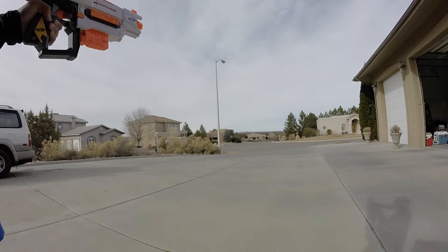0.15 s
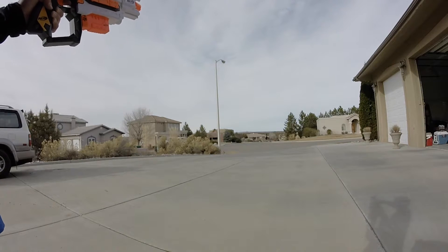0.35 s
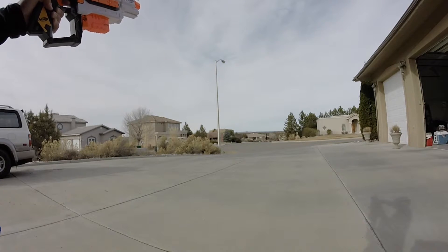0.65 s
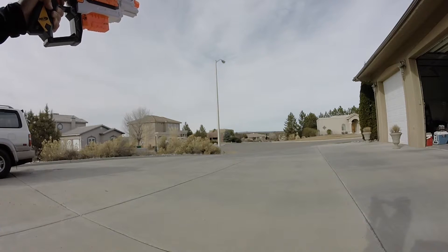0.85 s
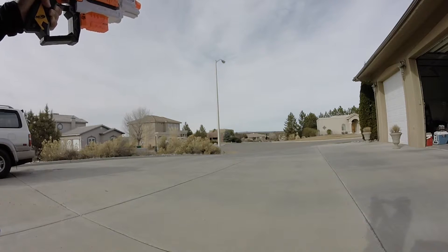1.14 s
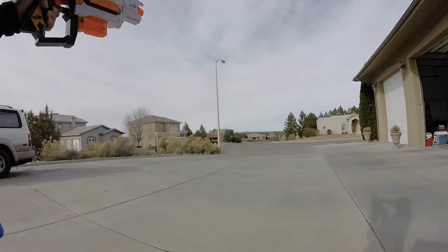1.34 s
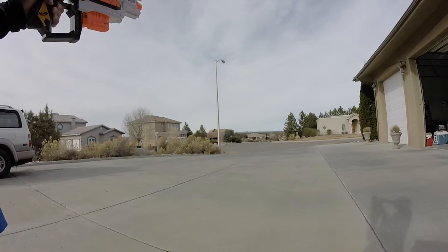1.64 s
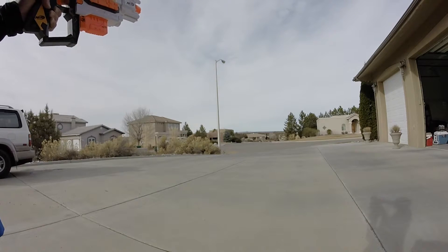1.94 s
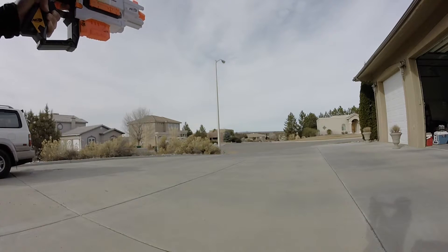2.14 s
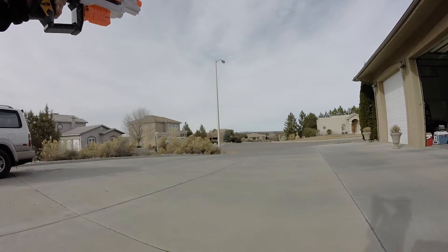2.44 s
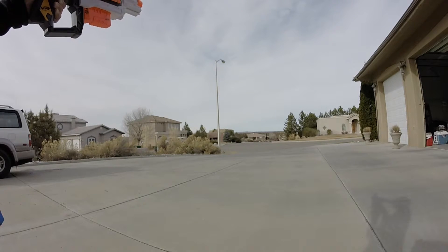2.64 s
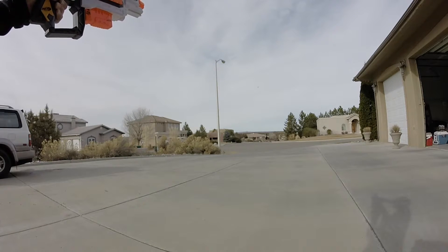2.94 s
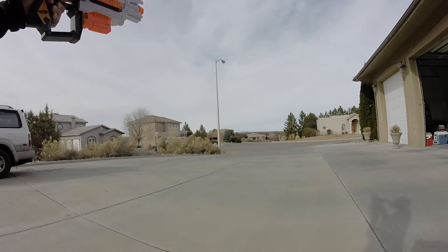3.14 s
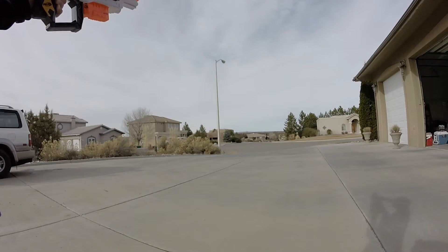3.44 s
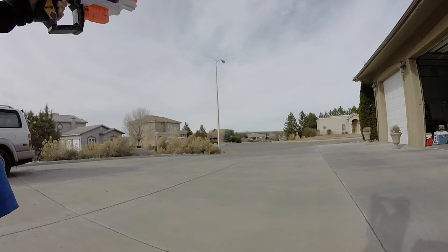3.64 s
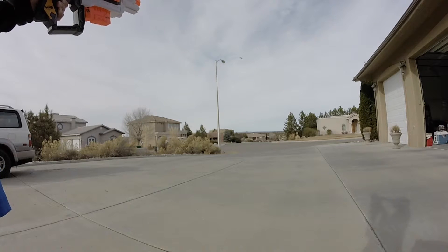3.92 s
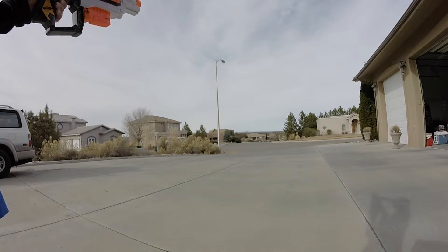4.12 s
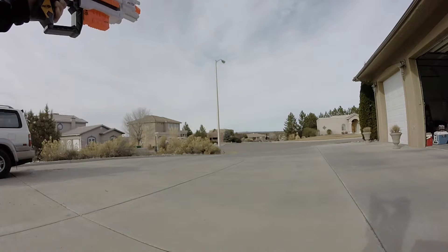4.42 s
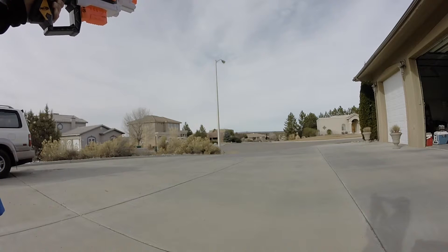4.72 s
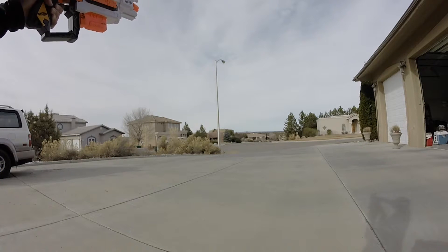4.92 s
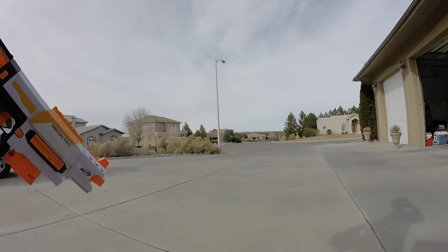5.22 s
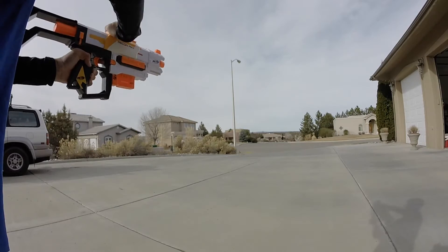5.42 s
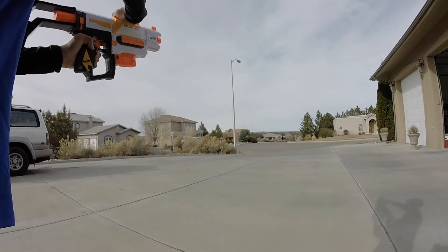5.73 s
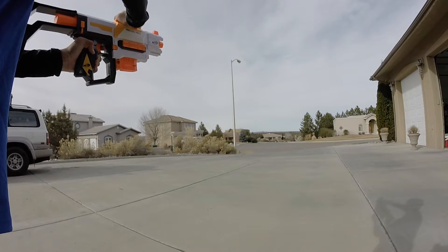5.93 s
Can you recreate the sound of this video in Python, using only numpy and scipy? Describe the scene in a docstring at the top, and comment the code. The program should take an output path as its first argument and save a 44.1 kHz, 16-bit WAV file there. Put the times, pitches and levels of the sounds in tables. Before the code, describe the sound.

Close to the microphone on an open concrete driveway, a plastic toy blaster is cocked with a quick ratcheting rasp and loud latch, then pushed home with a double knock. Each of four shots snaps and pops sharply with a short springy buzz. Small handling ticks fill the gaps, faint reflections come off the garage and houses, and a final push clacks at the end over faint wind.

```python
"""A concrete driveway by a garage, far houses beyond: a spring-powered plastic dart blaster fires four times.
Before each shot the slide rasps back and latches, then is pushed home with a double knock; it is pushed
once more before the first shot and after the last. Each shot is a catch snapping, a plunger slam, a pop of
air, a kick and a buzzing spring. Contacts are noise bursts plus dying sines for shell and hollow.
Ground, garage and houses answer; a far hush, a low drone, light wind and soft bumps lie beneath."""
import sys
import numpy as np
from scipy import signal
from scipy.fft import rfft, irfft
from scipy.io import wavfile

SR = 44100
rng = np.random.default_rng(int(sys.argv[2]) if len(sys.argv) > 2 else 0)


def unload_audio(sound):
    """Save the sound as a 16-bit wav file, at the path given as the first command line argument."""
    columns = np.transpose(np.atleast_2d(sound))
    # keep every value between -1 and 1, then stretch to whole-number steps
    steps = np.round(np.clip(columns, -1, 1) * 32767)
    wavfile.write(sys.argv[1], SR, steps.astype(np.int16))


N = 267687
TIME = np.arange(N) / SR  # scene clock [s]
AGE = TIME[:SR // 4]  # time since a single sound began [s]

# All event levels are mix settings; the sound's own function trims them further.
# distant outdoor hush: (frequency [Hz], relative density [dB per Hz])
HUSH_COLOUR = [(41, -31.5), (70, -4), (129, -10.5), (218, -8), (431, -13), (517, -15), (892, -16.5),
               (1650, -22.5), (2120, -24), (4090, -30.5), (4910, -33.5), (13300, -48), (14600, -49.5),
               (16000, -74)]
# a faint low drone: (time [s], level [dB])
DRONE_LEVEL = [(0, -66.5), (1.6, -61.5), (3.1, -54), (3.8, -56.5), (4.3, -73), (6.07, -64.5)]
# gusts over a light steady breeze: (middle [s], half length [s], level [dB])
GUSTS = [(.4, .1, -56), (1.36, 0.21, -52), (4.96, 0.2, -49.5)]
# soft bumps on the microphone mount: (time [s], level [dB])
MOUNT_BUMPS = [(0.444, -30.5), (1.194, -31.5), (4.971, -34), (5.136, -25)]
# the slide is pulled back against the spring until it latches:
# (start [s], latch [s], rasp [dB], latch crack [dB], latch knock [dB], hollow pitch [Hz])
PULLS = [(.081, 0.153, -17.5, -5.5, -9, 718), (2.171, 2.2427, -16.5, -3, -25, 426),
         (3.241, 3.3047, -15, -4, -21, 426), (4.297, 4.3602, -15.5, -3, -20, 433)]
# the slide is pushed home, seats and locks:
# (start [s], seat [s], rub [dB], crack [dB], knock [dB], seat pitch [Hz], lock pitch [Hz])
PUSHES = [(0.256, 0.3044, -22.5, -25, -16.5, 439, 437), (1.33, 1.35, -22, -17, -14.5, 590, 407),
          (2.354, 2.415, -18.5, -9, -12, 730, 396), (3.412, 3.466, -20, -8.5, -16.5, 597, 358),
          (4.469, 4.525, -21, -5, -13.5, 596, 479), (5.452, 5.532, -22, -7, -13, 404, 340)]
# the slide snags on its way: (time [s], crack [dB], knock [dB], hollow pitch [Hz])
SNAGS = [(.114, -9, -18.5, 717), (.265, -21.5, -21.5, 695), (1.3266, -19.5, -30, 436),
         (1.339, -18.5, -18, 366), (2.196, -19, -22.5, 467), (2.222, -9, -31, 641),
         (2.368, -20.5, -18.5, 481), (2.401, -15, -27, 449), (3.262, -18, -20.5, 510),
         (4.323, -19, -18.5, 428), (4.485, -25, -18.5, 737), (5.462, -29, -43, 594),
         (5.478, -32, -20.5, 530), (5.515, -12.5, -29, 666)]
# trigger, fingers and loose parts: (time [s], tick [dB], knock [dB])
TICKS = [(.226, -31.5, -52), (.372, -36.5, -50), (0.829, -46, -54.5), (.884, -65, -50.5),
         (1.103, -41.5, -56), (1.137, -38, -42.5), (1.204, -40, -42), (1.288, -47.5, -46.5),
         (1.628, -39.5, -49), (1.668, -47, -48), (1.819, -34, -54), (1.867, -44.5, -48),
         (1.999, -40.5, -65.5), (2.327, -31, -39.5), (2.780, -34, -35.5), (2.801, -35, -44),
         (2.940, -29, -47.5), (2.982, -31.5, -47), (3.384, -33, -55), (3.859, -39.5, -42.5),
         (3.881, -36, -48.5), (4.049, -34.5, -45), (4.063, -35.5, -43.5), (4.778, -40, -45),
         (4.807, -39, -50), (4.938, -41, -60), (4.965, -29, -50), (5.005, -38, -75), (5.181, -55, -49.5),
         (6.002, -49, -51.5), (6.047, -44.5, -53)]
# the hand shifts on the grip, pressing ever harder: (start [s], end [s], final level [dB])
GRIP_RUBS = [(0.797, 0.905, -69), (1.132, 1.216, -56), (4.892, 4.978, -39.5)]
# shots: (catch release [s], slam [dB], air pop [dB], pop pitch [Hz], thump [dB], spring buzz [dB])
SHOTS = [(1.7054, -5, 1, 587, -18, -25), (2.8227, -6.5, -8.5, 462, -18.5, -25),
         (3.9046, -7.5, -1, 465, -21.5, -26.5), (4.8317, -7.5, -29.5, 574, -31, -34)]
# modes of the plastic shell: (frequency [Hz], relative level [dB], t60 [s])
SHELL_MODES = [(245, -36.5, .05), (345, -9, 0.082), (434.7, -3.5, 0.061), (466, 4.5, 0.03),
               (574, -2, 0.053), (705, 4, 0.011), (976, -5, 0.051), (1080, -7.5, .04), (1438, -0.5, 0.026),
               (1644, -4.5, 0.027), (2250, -16.5, 0.031), (2800, -9, 0.046), (3834, -14.5, 0.04),
               (4700, -16.5, .05), (6700, -24, .05)]
# air in the barrel and plunger tube: (frequency [Hz], relative level [dB], t60 [s])
BARREL_MODES = [(940, -7.5, 0.03), (1067, -4.5, 0.012), (1440, -7, 0.01)]
# low modes of the whole blaster kicked by the plunger: (frequency [Hz], relative level [dB], t60 [s])
RECOIL_MODES = [(89, 1.5, 0.049), (163, 1, 0.05), (217, 2.5, 0.078)]
# colour of a hard plastic contact: (frequency [Hz], relative level [dB])
CRACK_COLOUR = [(60, -39.5), (170, -17.5), (260, -11.5), (400, 1.5), (800, 0.5), (1300, -1.5), (2000, -2.5),
                (2800, -3), (4000, -4.5), (5600, -4.5), (7500, -10.5), (10000, -16), (13000, -23),
                (16000, -31)]
# colour of the coil spring's buzz: (frequency [Hz], relative level [dB])
SPRING_COLOUR = [(100, -13), (400, -4.5), (750, -6), (1200, -2), (2200, -11.5), (4400, -9.5), (5050, -4.5),
                 (5700, -3), (6600, -12.5), (9000, -13.5), (15000, -34)]
# how squarely the side panels face the microphone, brighter when the blaster is lowered in front:
# (time [s], level of the added band [dB])
PANEL_FACING = [(0, -14), (5.2, -31), (5.4, -5), (6.07, 0)]
# colour of sound scattered from near things: (frequency [Hz], relative level [dB])
NEAR_COLOUR = [(150, 6.5), (400, -0.5), (1000, 2.5), (3000, 0), (6000, -5), (10000, -5.5), (15000, -3.5)]
# colour of sound returning from far houses: (frequency [Hz], relative level [dB])
FAR_COLOUR = [(100, -8), (350, -9.5), (750, 2.5), (1500, 1), (2500, 1.5), (4500, -3), (6500, -9.5),
              (9000, -16), (15000, -26.5)]

# pulling: shares of the way at which the rasp is full and the slide stops; rise and later sag [dB]
PULL_FULL, PULL_STOP, PULL_RISE_DB, PULL_SAG_DB = 0.38, .8, 23.5, 3
# pushing: swell of the rub [dB], seating to locking [s], seating relative to locking [dB]
PUSH_RISE_DB, LOCK_S, SEAT_CRACK_DB, SEAT_KNOCK_DB = 18.5, .0072, -2.5, -1.5
# rattle decay of each kind of contact [ms]
LATCH_MS, SEAT_MS, LOCK_MS, TOOTH_MS, SNAG_MS, TICK_MS = 5, 3.6, 5.05, 2.8, 3.2, 5
# middle pitch of the ratchet teeth and pitch of the ticks [Hz]
TOOTH_HZ, TICK_HZ = 564, 700


def from_db(db):
    """Decibels to amplitude."""
    return 10 ** (np.asarray(db) / 20)


def rms_one(x):
    """Scale to an rms of 1."""
    return x / np.sqrt(np.mean(x ** 2) + 1e-20)


def curve(rows):
    """Join (time, value) rows by straight lines."""
    return np.interp(TIME, *np.transpose(rows))


def during(start, end):
    """1 between two times, else 0."""
    return (TIME >= start) * (TIME < end)


def add(out, s, sound):
    """Mix a sound in at a time in seconds."""
    at = int(np.clip(round(s * SR), 0, N - 1))
    out[at:at + len(sound)] += sound[:N - at]


def convolve(x, response):
    """Pass a sound through a response, cut to the scene's length."""
    return signal.fftconvolve(x, response)[:N]


def colour(x, points, size=4096):
    """Causal (minimum-phase) filter through the points; white noise keeps its power."""
    hz, db = np.transpose(points)
    bins_hz = np.fft.rfftfreq(size, 1 / SR)
    gain = from_db(np.interp(np.log(bins_hz + 1), np.log(hz), db))
    # folding the cepstrum forward in time gives minimum phase
    cepstrum = irfft(np.log(rms_one(gain)))
    cepstrum[1:size // 2] *= 2
    cepstrum[size // 2 + 1:] = 0
    return convolve(x, irfft(np.exp(rfft(cepstrum))))


def band(x, low_hz, high_hz, order):
    """Keep one frequency band."""
    sos = signal.butter(order, [low_hz, high_hz], "band", fs=SR, output="sos")
    return signal.sosfilt(sos, x)


def band_noise(low_hz, high_hz):
    """Noise in one band, rms 1."""
    return rms_one(band(rng.standard_normal(N), low_hz, high_hz, order=2))


def dull(x, edge_hz):
    """A gentle low-pass."""
    return signal.sosfilt(signal.butter(1, min(edge_hz, SR / 2 - 1), fs=SR, output="sos"), x)


def ring(hz, t60):
    """A struck mode: a dying sine."""
    return np.sin(2 * np.pi * hz * AGE) * from_db(-60 * AGE / t60)


def strike(modes, scatter_db):
    """Every blow shares itself out differently among the modes, which alternate in sign."""
    out = np.zeros(len(AGE))
    for k, (hz, db, t60) in enumerate(modes):
        level_db = db + scatter_db * rng.uniform(-1, 1)
        out += (-1) ** k * from_db(level_db) * ring(hz, t60)
    return out


def rattle(decay_ms, rise_ms, grain_db):
    """Parts chatter against each other in a noise flurry that dies away; grain makes it uneven."""
    ms = 1000 * AGE
    knots = np.arange(0, ms[-1], .5)
    unevenness = np.interp(ms, knots, rng.uniform(-3.5, 1.7, len(knots)))
    grain = rms_one(from_db(grain_db * unevenness))
    envelope = np.exp(-ms / max(decay_ms, .5)) * (1 - np.exp(-ms / rise_ms))
    return grain * rng.standard_normal(len(AGE)) * envelope


def wind(breeze_db=-57):
    """Lumpy low noise at the microphone: a breeze with bell-shaped gusts."""
    strength = from_db(breeze_db)
    for middle, half_s, db in GUSTS:
        strength = strength + from_db(db) * np.exp(-((TIME - middle) / half_s) ** 2)
    return strength * band_noise(24, 83)


def outdoors(hush_db=-54.5, drone_hz=118):
    """Far hush, a narrow-band low drone, and wind and bumps at the microphone."""
    out = from_db(hush_db) * colour(rng.standard_normal(N), HUSH_COLOUR)
    out += from_db(curve(DRONE_LEVEL)) * band_noise(drone_hz - 2, drone_hz + 2)
    out += wind()
    for s, db in MOUNT_BUMPS:
        add(out, s, from_db(db) * ring(51, 0.049))
    return out


def teeth(start, end, rub_db, crack_db, knock_db, count=6, jitter=.15, spread_db=2.5, spread_octaves=.3):
    """The pawl drops over the ratchet teeth at nearly even steps, as hard as the slide is driven."""
    chance = rng.uniform(-1, 1, (count, 4))
    step = np.arange(count)
    uneven_step = step + jitter * chance[:, 0] * (step > 0)
    times = start + (end - start) * uneven_step / count
    hits = []
    for s, db, (_, a, b, c) in zip(times, np.interp(times, TIME, rub_db), chance):
        hz = TOOTH_HZ * 2 ** (spread_octaves * c)
        hits.append((s, db + crack_db + spread_db * a, db + knock_db + spread_db * b, TOOTH_MS, hz))
    return hits


def pulls():
    """The rasp swells, sags as the spring tightens and fades until the latch; gives pressure and contacts."""
    pressure, hits = np.zeros(N), []
    for start, latch, db, crack_db, knock_db, hz in PULLS:
        full = start + (latch - start) * PULL_FULL
        stop = start + (latch - start) * PULL_STOP
        rub_db = curve([(start, db - PULL_RISE_DB), (full, db),
                        (stop, db - PULL_SAG_DB), (latch, db - PULL_RISE_DB)])
        pressure += from_db(rub_db) * during(start, latch)
        hits += teeth(start, stop, rub_db, crack_db=-1, knock_db=-6)
        hits.append((latch, crack_db, knock_db, LATCH_MS, hz))
    return pressure, hits


def slide(pressure, slips_per_s=300, rub_db=-1.0, slip_db=-7.0, body_db=-22.0):
    """Plastic sticks and slips along the rails, shaking the shell."""
    slips = (rng.random(N) < slips_per_s / SR) * rng.uniform(0.36, 1, N)
    slip_envelope = convolve(slips, np.exp(-AGE / 0.00034))
    grit = rms_one(slip_envelope * rng.standard_normal(N))
    force = pressure * (from_db(slip_db) * grit + from_db(rub_db) * rng.standard_normal(N))
    shell = strike(SHELL_MODES, scatter_db=5.5)
    body = convolve(force, shell / np.linalg.norm(shell))
    return colour(force, CRACK_COLOUR) + from_db(body_db) * body


def contacts(rows, crack_db, shell_db, hollow_db, hollow_t60, rise_share):
    """Each contact is a bright crack, a ring of the shell and a hollow knock at its own given pitch."""
    cracks, knocks = np.zeros((2, N))
    for s, db, knock_db, decay_ms, hollow_hz in rows:
        crack = rattle(decay_ms, rise_share * decay_ms, grain_db=0.0)
        add(cracks, s, from_db(db + crack_db) * crack)
        add(knocks, s + .0006, from_db(knock_db + shell_db) * strike(SHELL_MODES, scatter_db=0.5))
        add(knocks, s + 0.00098, from_db(knock_db + hollow_db) * ring(hollow_hz, hollow_t60))
    return colour(cracks, CRACK_COLOUR) + knocks


def facing(x):
    """The flat side panels beam their upper middle range."""
    return x + from_db(curve(PANEL_FACING)) * band(x, 2000, 2900, order=1)


def scatter(x, delay_s, t60, swap_hz=15.0, count=3):
    """Many small reflections swell and die; diffuse patterns trade places, so no single one stands out."""
    envelope = from_db(-60 * TIME / t60) * (1 - np.exp(-(TIME / delay_s) ** 2))
    out = np.zeros(N)
    for k in range(count):
        response = envelope * rng.standard_normal(N)
        # the shares trade places while their summed power stays even
        share = np.cos(np.pi * (swap_hz * TIME + k / count)) * np.sqrt(2 / count)
        out += convolve(x * share, response[:SR] / np.linalg.norm(response))
    return out


def driveway(x, ground_db=-21.0, wall_db=-23.0, house_db=-32.5, wall_hz=1300, near_db=-16.5, far_db=-35.5):
    """A bounce off the concrete, dull ones off the garage and house, scatter from near things and far houses."""
    out = from_db(near_db) * colour(scatter(x, delay_s=0.0068, t60=0.17), NEAR_COLOUR)
    out += from_db(far_db) * colour(scatter(x, delay_s=0.062, t60=0.65), FAR_COLOUR)
    add(out, .0075, from_db(ground_db) * x)
    add(out, .038, from_db(wall_db) * dull(x, wall_hz))
    add(out, .098, from_db(house_db) * dull(x, wall_hz))
    return out


def handling():
    """Trigger, fingers and loose parts make softer contacts than the slide does."""
    touches = [(s, db, knock_db, TICK_MS, TICK_HZ) for s, db, knock_db in TICKS]
    ticks = contacts(touches, crack_db=2.5, shell_db=1.5, hollow_db=-5.0, hollow_t60=0.037, rise_share=0.34)
    return dull(ticks, edge_hz=9000)


def pushes():
    """The rub grows with the slide's speed, through a double knock; gives pressure and contacts."""
    pressure, hits = np.zeros(N), []
    for start, seat, db, crack_db, knock_db, seat_hz, lock_hz in PUSHES:
        lock = seat + LOCK_S
        rub_db = curve([(start, db - PUSH_RISE_DB), (lock, db)])
        # the rub holds on briefly after locking
        pressure += from_db(rub_db) * during(start, lock + LOCK_S)
        hits += teeth(start, seat, rub_db, crack_db=8.5, knock_db=-3.5)
        hits.append((seat, crack_db + SEAT_CRACK_DB, knock_db + SEAT_KNOCK_DB, SEAT_MS, seat_hz))
        hits.append((lock, crack_db, knock_db, LOCK_MS, lock_hz))
    return pressure, hits


def grip(rise_db=8):
    """Pressure of the hand rubbing on the grip."""
    pressure = np.zeros(N)
    for start, end, db in GRIP_RUBS:
        pressure += from_db(curve([(start, db - rise_db), (end, db)])) * during(start, end)
    return pressure


def shots(travel_s=.0062, pop_delay_s=.0085, pop_t60=0.025, catch_db=-4.0, body_db=-12.0):
    """The catch lets go, the plunger slams home, air pops the dart out and the whole blaster kicks."""
    cracks, lows = np.zeros((2, N))
    kick = strike(RECOIL_MODES, scatter_db=0)
    for s, slam_db, pop_db, pop_hz, thump_db, _ in SHOTS:
        slam = s + travel_s
        add(cracks, s, from_db(slam_db + catch_db) * rattle(4.4, rise_ms=1.0, grain_db=-2.5))
        add(cracks, slam, from_db(slam_db) * rattle(5.0, rise_ms=0.18, grain_db=2.5))
        add(lows, slam, from_db(slam_db + body_db) * strike(SHELL_MODES, scatter_db=-2.5))
        add(lows, slam, from_db(slam_db) * strike(BARREL_MODES, scatter_db=1.5))
        pop = ring(pop_hz, pop_t60) * (1 - np.exp(-AGE / 0.0011))
        add(lows, s + pop_delay_s, from_db(pop_db) * pop)
        add(lows, slam, from_db(thump_db) * kick)
    return colour(cracks, CRACK_COLOUR) + lows


def spring(whine_hz=5030, whine_db=-12.0, whine_t60=.2, touches_per_s=90, touch_db=0.0, settle_s=0.05):
    """With each shot the loose coil buzzes, whines and taps the wall of its tube."""
    buzz, metal, taps = np.zeros((3, N))
    for s, *_, buzz_db in SHOTS:
        level = from_db(buzz_db)
        add(buzz, s + 0.0046, level * rattle(29.0, rise_ms=4.0, grain_db=13.0))
        whine = ring(whine_hz, whine_t60) + ring(whine_hz * 0.73, whine_t60) / 2
        add(metal, s + 0.019, level * from_db(whine_db) * whine)
        touches = (rng.random(len(AGE)) < touches_per_s / SR) * np.exp(-AGE / settle_s)
        tapping = convolve(touches, rattle(1.0, rise_ms=.1, grain_db=2.0))
        add(taps, s + 0.016, level * from_db(touch_db) * tapping)
    return colour(buzz + taps, SPRING_COLOUR) + metal


def scene():
    """The blaster is worked and fired above the driveway, in light wind."""
    pull_pressure, pull_hits = pulls()
    push_pressure, push_hits = pushes()
    snags = [(s, db, knock_db, SNAG_MS, hz) for s, db, knock_db, hz in SNAGS]
    clacks = contacts(pull_hits + push_hits + snags, crack_db=0.5, shell_db=-6.5, hollow_db=-0.5,
                      hollow_t60=.048, rise_share=0.16)
    rubbing = slide(pull_pressure + push_pressure + grip())
    blaster = facing(clacks + handling() + rubbing + shots() + spring())
    return (blaster + driveway(blaster) + outdoors())[None]


def record(dry, ceiling=.85, cutoff_hz=15500):
    """The highest peaks are rounded and the top is cut."""
    rounded = dry / (1 + (dry / ceiling) ** 4) ** .25
    low_pass = signal.firwin(161, cutoff_hz, window="blackman", fs=SR)
    return signal.fftconvolve(rounded, low_pass[None], "same")


dry = scene()
out = record(dry)
unload_audio(out)
```